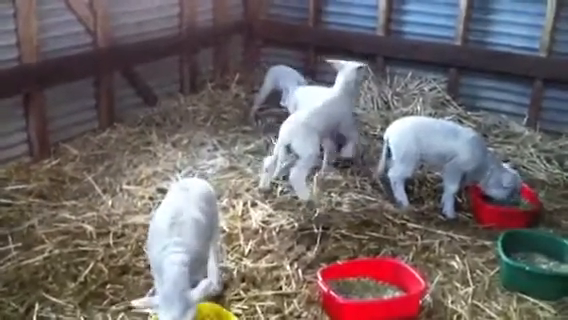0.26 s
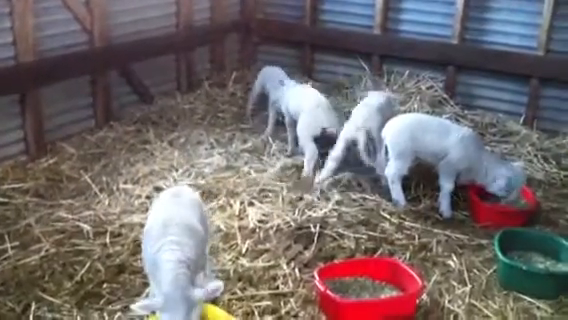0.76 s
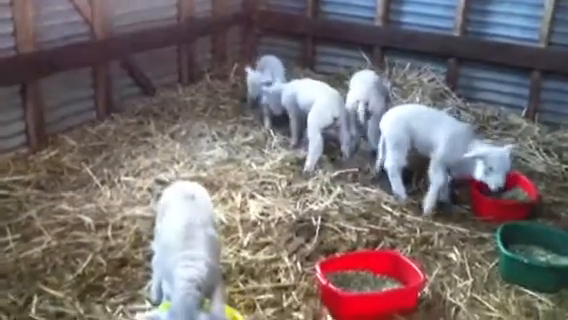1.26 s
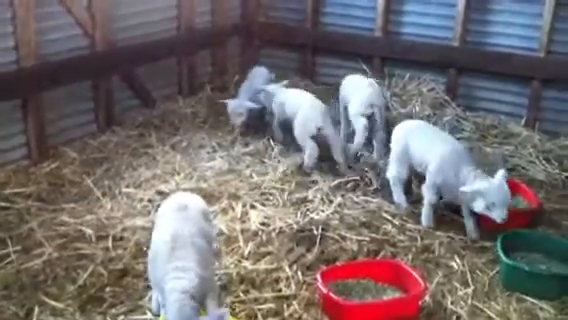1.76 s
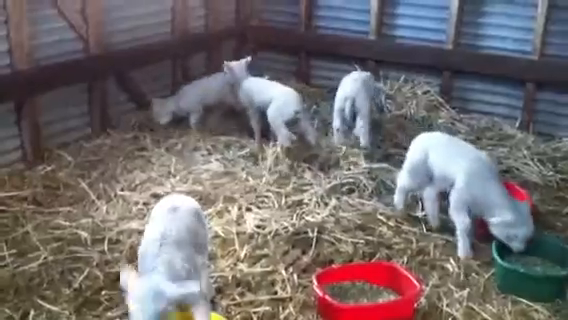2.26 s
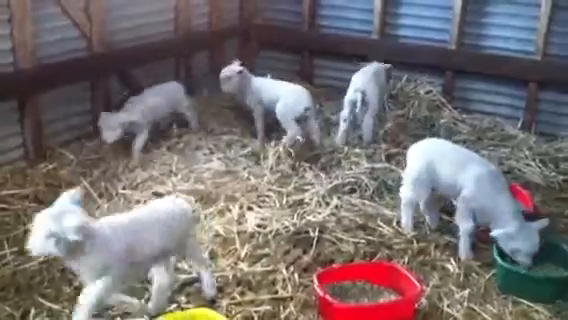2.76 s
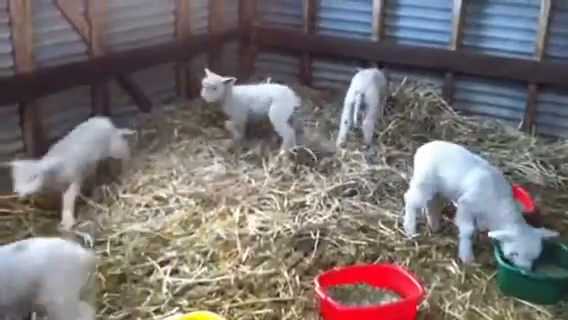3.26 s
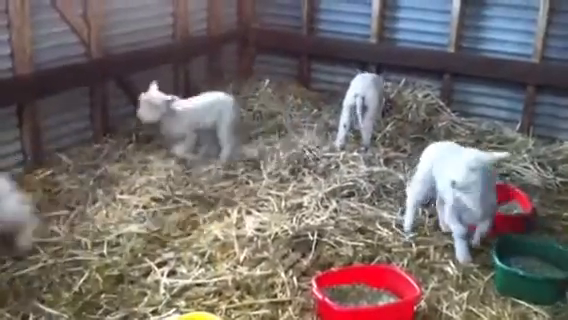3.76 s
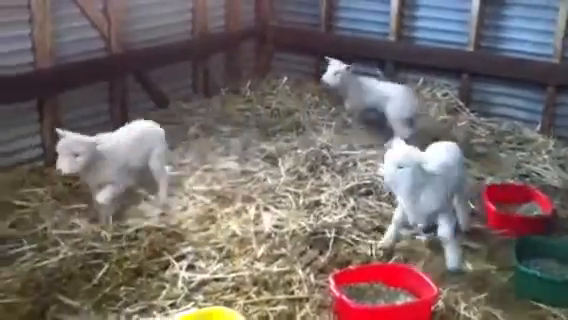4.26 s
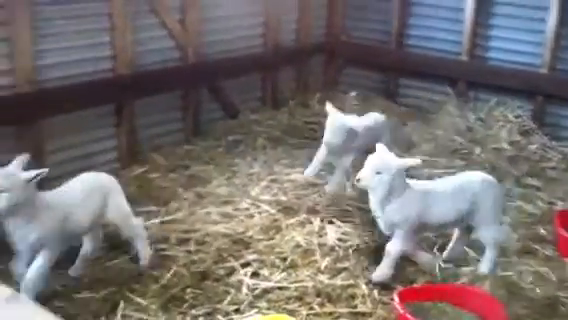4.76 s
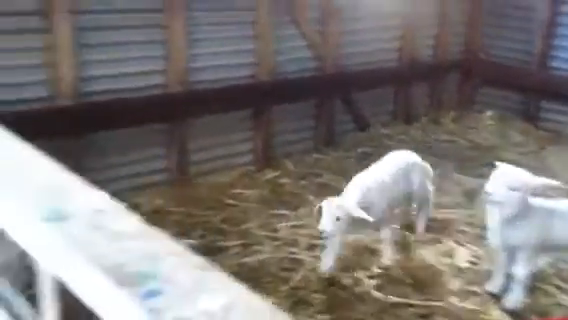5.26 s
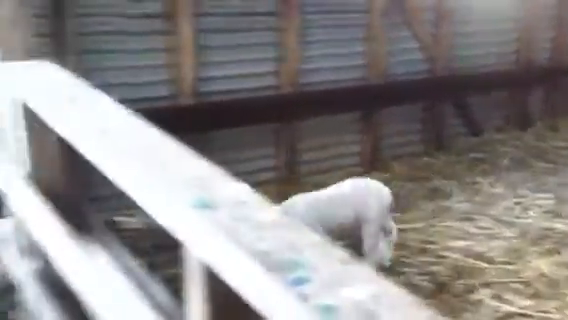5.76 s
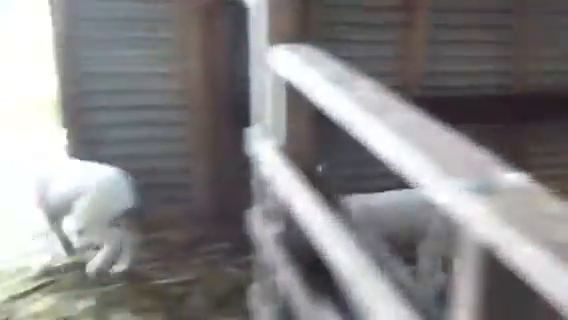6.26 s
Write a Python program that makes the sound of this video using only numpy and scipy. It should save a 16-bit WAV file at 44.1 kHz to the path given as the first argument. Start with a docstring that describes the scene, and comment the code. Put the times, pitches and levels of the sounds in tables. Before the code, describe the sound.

In a small tin shed, lambs move over dry straw near a single microphone, with a short echo and faint, low steady air noise. From 0 to 1 s the straw rustles lightly in separate steps, with small dull taps. At about 1.2 s a firmer low thud and scuff sound, then quieter shuffling. From 2 s the crackle grows brighter and denser, peaking near 2.3 s; hard woody knocks and a scrape come at 2.6-2.7 s with a burst of muffled patter. Between 3 and 4 s it is mostly quick straw steps, with a sharp stalk snap at 3.6 s. Trotting stays full from 4.1 to 5.2 s, knocks returning around 4.9 and 5.1 s. A distinct scuff comes near 5.4 s, a sharp snap at 5.5 s, then patter. The straw subsides; a very faint, wavering far bleat passes at 5.9-6.1 s, with last soft taps until 6.5 s.

```python
"""In a tin shed pen, lambs trot about on dry straw, close to a single microphone.
Straw crackles as clumped random snaps through band filters, with sharp ticks as single stalks break.
Hooves knock, scuff and patter on the boards below, heard as sums of decaying modes.
A thin far call, one wavering partial, sounds faintly near the end.
Sparse reflections give the shed's echo, over a steady low-weighted noise of air."""
import sys
import numpy as np
from scipy import signal
from scipy.io import wavfile
from scipy.ndimage import uniform_filter1d

SR = 44100
rng = np.random.default_rng(int(sys.argv[2]) if len(sys.argv) > 2 else 0)


def unload_audio(sound):
    """Save the sound as a 16-bit wav file, at the path given as the first command line argument."""
    columns = np.transpose(np.atleast_2d(sound))
    # keep every value between -1 and 1, then stretch to whole-number steps
    steps = np.round(np.clip(columns, -1, 1) * 32767)
    wavfile.write(sys.argv[1], SR, steps.astype(np.int16))


def volts_from_db(level):
    """Convert decibel levels to linear amplitude ratios."""
    exponent = np.asarray(level, float) / 20
    return 10 ** exponent


N = 287958  # length in samples
USUAL_DB = -50  # reference level of the straw


def evened(x):
    """Normalisation: scales a signal to rms 1."""
    return x / np.sqrt(np.mean(x ** 2) + 1e-20)


def read(points, hz):
    """Interpolation along straight lines on a log-frequency axis."""
    f, value = np.transpose(points)
    return np.interp(np.log(hz + 1), np.log(f + 1), value)


def curves(rows):
    """Linear interpolation in time: every column after the first, sample by sample."""
    s, *columns = np.transpose(rows)
    t = np.arange(N) / SR
    return [np.interp(t, s, column) for column in columns]


def coloured(x, points):
    """Minimum-phase filtering: the log gain fixes the phase through the Hilbert transform."""
    hz = abs(np.fft.fftfreq(8192, 1 / SR))
    log_gain = np.log(volts_from_db(np.maximum(read(points, hz), -100)))
    phase = -signal.hilbert(log_gain).imag
    taps = np.fft.ifft(np.exp(log_gain + 1j * phase)).real[:4096]
    return signal.oaconvolve(x, taps)[:len(x)]


def clicks(per_s, spread_db):
    """Random impulse train: chance instants and signs, most impulses small and a few large."""
    size = volts_from_db(spread_db * np.minimum(rng.exponential(1, N), 5))
    sign = np.sign(rng.standard_normal(N))
    return size * sign * (rng.random(N) < per_s / SR)


def wander(width):
    """Smoothed noise: two moving averages of width samples leave slow chance of rms 1."""
    once = uniform_filter1d(rng.standard_normal(N), width)
    return evened(uniform_filter1d(once, width))


# steady shuffle of the flock in the straw: start_s [s], level_db [dB]
SHUFFLE_LEVEL = [(0, -54.5), (.4, -55.5), (.55, -50.5), (1.3, -54), (1.65, -52), (2.0, -45), (2.5, -45),
                 (2.8, -47.5), (2.95, -44.5), (3.65, -48), (4.1, -43), (4.6, -45), (4.9, -52.5),
                 (5.3, -48.5), (5.75, -49.5), (5.85, -53), (6.4, -55.5), (6.53, -63)]
# a leg sweeping or a hoof landing in dry stalks:
# crest_s [s], level_db [dB], rise_s [s], fall_s [s]
STRIDES = [(.17, -52.5, 0.026, 0.045), (.235, -46, 0.047, 0.04), (.35, -51.5, 0.045, 0.034),
           (.465, -50.5, 0.033, 0.035), (.6, -45.5, 0.042, 0.098), (.72, -45, 0.022, 0.032),
           (.88, -44.5, 0.05, 0.12), (1.07, -44, 0.066, 0.14), (1.21, -55, 0.019, 0.026),
           (1.46, -48.5, 0.11, 0.063), (1.61, -49.5, 0.01, 0.024), (1.86, -50.5, 0.041, 0.036),
           (2.13, -42, 0.05, 0.042), (2.27, -39, 0.086, 0.086), (2.6, -42, 0.038, 0.034),
           (2.685, -41.5, 0.034, 0.054), (2.88, -47.5, .03, 0.052), (3.145, -45.5, 0.024, 0.044),
           (3.245, -46, 0.0091, .03), (3.36, -45, 0.059, 0.048), (3.46, -47.5, 0.048, 0.058),
           (3.615, -44, 0.041, 0.042), (3.73, -46, 0.012, 0.042), (3.85, -44, 0.041, 0.063),
           (4.04, -56, .015, 0.063), (4.15, -45.5, 0.048, 0.036), (4.285, -42.5, 0.032, 0.037),
           (4.4, -41, 0.067, 0.027), (4.48, -41.5, 0.032, 0.036), (4.6, -43, .05, 0.1),
           (4.785, -40.5, 0.03, 0.082), (4.98, -41.5, 0.036, 0.054), (5.16, -41, 0.055, 0.051),
           (5.38, -51, .06, 0.041), (5.54, -48, .008, .025), (5.71, -63, .04, .05),
           (5.89, -55, .012, 0.025), (6.08, -54, 0.073, 0.012), (6.17, -57, .03, .08),
           (6.5, -52.5, 0.041, .04)]
# bands where stalks snap, from thick to thin: low_hz [Hz], high_hz [Hz]
STALK_BANDS = [(250, 2000), (2000, 5000), (5000, 9000), (9000, 17000)]
# colour of snapping stalks, with the microphone's treble bump: pitch_hz [Hz], relative level_db [dB]
STRAW_COLOUR = [(300, -22), (500, -6.5), (1200, -6), (2400, -4.5), (5000, -0.5), (8400, 1), (10500, 4.5),
                (12000, 5.5), (13500, 4.5), (15000, -0.5), (16000, 1)]


def straw():
    """Granular noise: dense snaps clump as feet crush stalks, thick and thin partly on their own."""
    power = volts_from_db(curves(SHUFFLE_LEVEL)[0]) ** 2
    t = np.arange(N) / SR
    for crest, db, rise, fall in STRIDES:
        near = slice(max(round((crest - .5) * SR), 0), round((crest + .5) * SR))
        late = t[near] - crest
        width = np.where(late < 0, rise, fall)
        power[near] += volts_from_db(db) ** 2 * np.exp(-(late / width) ** 2)
    # thick stalks against thin: they swell slightly more
    thick_db = -9.5 + 0.0248 * (10 * np.log10(power) - USUAL_DB)

    shared_db = 0.51 * wander(400)
    bands = []
    for low, high in STALK_BANDS:
        snaps = clicks(per_s=9000, spread_db=1) * volts_from_db(shared_db + .5 * wander(300))
        band_pass = signal.butter(3, [low, high], "band", fs=SR, output="sos")
        bands.append(signal.sosfilt(band_pass, evened(snaps)))
    thick = evened(coloured(bands[0] + bands[1], STRAW_COLOUR))
    thin = evened(coloured(bands[2] + bands[3], STRAW_COLOUR))
    return np.sqrt(power) * (thin + volts_from_db(thick_db + 1.5 * wander(2500)) * thick)


# single dry stalks breaking: start_s [s], peak level_db [dB]
TICKS = [(3.5783, -26), (4.9627, -30), (5.2774, -33), (5.5368, -23), (6.129, -42)]


def ticks():
    """Impulse response: each break is one or two treble cycles; small ones follow the shuffle's level."""
    tick_hz, tick_s = 12600, .00009  # pitch; half-width of the Gaussian envelope
    small_db = -47.5 + curves(SHUFFLE_LEVEL)[0] - USUAL_DB  # of the least of the small ticks
    train = volts_from_db(small_db) * clicks(per_s=40, spread_db=3.5)
    for start, db in TICKS:
        train[round(start * SR)] += volts_from_db(db)
    t = np.arange(-40, 41) / SR
    tick = np.exp(-(t / tick_s) ** 2) * np.cos(2 * np.pi * tick_hz * t)
    return signal.oaconvolve(train, tick, "same")


# modes of the floor and boards: pitch_hz [Hz], level_db [dB], share of the blow's t60 [ratio]
BOARD_MODES = [(118, -9.5, 0.3), (156.4, 0.5, 0.67), (199.2, 0.5, 0.91), (253.5, 1.5, 0.68),
               (327.4, 6.5, 0.38), (367, 0.5, 0.52), (480.7, 0.5, 0.62), (560, 3, 0.79), (670, 10, 0.31),
               (715.6, 0.5, 0.84), (905, 8, 0.47), (1002, 3, 0.63), (1129, 3, 0.72), (1390, 8.5, 0.53),
               (1670, 5, 0.44), (1827, 4, 0.54), (2058, 7.5, 0.3), (2360, 14.5, 0.21), (2880, 7, 0.27),
               (3660, 5, 0.18)]


def ring(hz, fall_db, t60, chance):
    """Modal synthesis: a blow favours modes near its pitch, and loose boards make each flutter."""
    f, db, share = np.transpose(BOARD_MODES)[:, :, None]
    f = f * (1 + 0.1 * (chance[:, None] - .5))  # each blow lands on another spot
    t = np.arange(SR // 4) / SR
    # padded blows lose the upper modes faster
    near_db = -fall_db * abs(np.log2(f / hz)) * np.where(f > hz, 1.3, 1)
    decay_db = -60 * t / (max(t60, .03) * share)
    flutter_hz = (0.0516 + 0.1184 * np.roll(chance, 3)[:, None]) * f
    flutter_depth = 1.48 * np.roll(chance, 5)[:, None]
    flutter = 1 + flutter_depth * np.cos(2 * np.pi * flutter_hz * t)
    tones = np.sin(2 * np.pi * (f * t + 0.52 * chance[::-1, None]))
    swell = 1 - np.exp(-f * t)  # over about one cycle
    sound = (volts_from_db(db + near_db + decay_db) * flutter * tones * swell).sum(0)
    return sound / abs(sound).max()


def below_cut(x):
    """Inefficient radiation: thin boards hardly radiate their deepest bass."""
    return signal.sosfilt(signal.butter(6, 105, "high", fs=SR, output="sos"), x)


# single knocks: start_s [s], peak level_db before the bass cut [dB], favoured pitch_hz [Hz],
# fall below that pitch [dB per octave], t60_s before each mode's share [s]
KNOCKS = [(0.083, -52, 335, 6, 0.22), (0.146, -44, 177, 14, 0.063), (0.351, -47, 1180, 17, 0.13),
          (0.37, -40.5, 176, 13, 0.16), (0.448, -47, 670, 8, 0.17), (0.623, -46, 153, 17, 0.49),
          (0.653, -48, 540, 29, 0.18), (0.734, -46.5, 132, 19, 0.41), (0.795, -44.5, 213, 16, 0.34),
          (0.846, -40.5, 194, 20, 0.31), (1, -46.5, 171, 14, 0.082), (1.14, -51, 204, 16, 0.1),
          (1.19, -43.5, 159, 5.5, 0.3), (1.228, -32, 153, 7.5, 0.07), (1.229, -33.5, 495, 15, 0.17),
          (1.347, -39.5, 312, 7, 0.11), (1.391, -44, 303, 9, 0.09), (1.606, -43.5, 600, 6, 0.12),
          (1.609, -39.5, 178, 14, 0.12), (1.657, -42, 330, 8.5, 0.095), (1.775, -46, 204, 32, 0.084),
          (2.164, -43.5, 497, 32, 0.32), (2.309, -42, 400, 0, 0.19), (2.582, -27, 895, 6.5, 0.11),
          (2.645, -40, 860, 20, 0.28), (2.691, -26.5, 310, 9.5, 0.21), (2.717, -39, 175, 25, 0.25),
          (2.893, -38.5, 260, 7.5, 0.2), (2.93, -38.5, 160, 15, 0.27), (2.962, -45.5, 1250, 15, 0.1),
          (2.984, -41.5, 200, 3, 0.17), (3.022, -46, 185, 14, 0.31), (3.656, -44, 177, 5, 0.078),
          (3.798, -54, 181, 26, 0.11), (4.388, -47, 191, 2, 0.12), (4.485, -43.5, 526, 12, 0.38),
          (4.779, -45, 361, 11, 0.13), (4.931, -36, 382, 7.5, 0.22), (4.951, -33, 220, 26, 0.16),
          (5.136, -31, 159, 9.5, 0.15), (5.383, -32.5, 560, 4, 0.16), (5.418, -38, 168, 6, 0.22),
          (5.458, -37, 265, 14, 0.16), (5.519, -41.5, 337, 14, 0.11), (5.609, -41, 214, 10, 0.3),
          (5.74, -45, 175, 5, 0.28), (5.987, -46, 165, 11.5, 0.34), (6.128, -44.5, 196, 8, 0.22),
          (6.198, -44.5, 154, 4.5, 0.11), (6.382, -53, 243, 11, 0.39)]


def knocks():
    """Impact excitation: each hoof on something hard sets the modes ringing once."""
    out = np.zeros(N + SR)
    chances = rng.random((len(KNOCKS), len(BOARD_MODES)))
    for (start, db, hz, fall_db, t60), chance in zip(KNOCKS, chances):
        out[round(start * SR):][:SR // 4] += volts_from_db(db) * ring(hz, fall_db, t60, chance)
    return below_cut(out[:N])


# hooves dragged or tubs shoved over the boards: start_s [s], end_s [s],
# rms level_db before the bass cut [dB], favoured pitch_hz [Hz], fall below that pitch [dB per octave]
SCUFFS = [(0.784, 0.928, -64, 447, 14), (1.235, 1.304, -55, 510, 31), (1.33, 1.424, -57.5, 423, 23),
          (1.923, 2.02, -65, 460, 21), (2.316, 2.419, -60, 655, 4.5), (2.588, 2.685, -52, 800, 7),
          (2.81, 2.88, -60, 400, 15), (2.913, 2.993, -61, 503, 6), (4.33, 4.56, -63.5, 550, 6),
          (4.752, 4.84, -62, 490, 9), (5.318, 5.4, -61.5, 605, 19), (5.375, 5.5, -47.5, 523, 14),
          (5.57, 5.684, -57.5, 610, 3), (6.164, 6.26, -65, 775, 12)]


def scuffs():
    """Stick-slip friction: tiny slips each ring the boards, under a stroke that starts fast and fades."""
    out = np.zeros(N + SR)
    slips = clicks(per_s=500, spread_db=3.2)
    chances = rng.random((len(SCUFFS), len(BOARD_MODES)))
    for (start, end, db, hz, fall_db), chance in zip(SCUFFS, chances):
        part = slips[round(start * SR):round(end * SR)]
        u = np.linspace(0, 1, len(part))
        stroke = np.minimum(u / 0.2, 1) * volts_from_db(-11 * u)
        brief_ring = ring(hz, fall_db, 0.039, chance)[:SR // 10]
        sound = signal.oaconvolve(part * stroke, brief_ring)
        out[round(start * SR):][:len(sound)] += volts_from_db(db) * evened(sound)
    return below_cut(out[:N])


# muffled drumming of many small feet through the bedding: start_s [s], level_db [dB]
PATTER_LEVEL = [(0, -63.5), (.3, -66), (.62, -57.5), (.9, -60.5), (1.0, -66), (1.25, -55.5), (1.45, -67.5),
                (2.03, -69), (2.27, -55.5), (2.44, -69), (2.72, -46.5), (2.85, -70), (3.1, -61.5),
                (4.1, -65.5), (4.4, -56), (5.1, -57), (5.35, -58.5), (5.56, -51.5), (5.85, -59),
                (6.53, -62)]


def patter():
    """Superposed random impacts: footfalls too many to count, dull thumps of eight chance pitches."""
    pats_per_s = 160  # of all eight kinds together
    thumps = np.zeros(N)
    for kind in rng.random((8, 1 + len(BOARD_MODES))):
        thump = ring(150 * 2.2 ** kind[0], 9.8, 0.16, kind[1:])
        thumps += signal.oaconvolve(clicks(pats_per_s / 8, 1.9), thump)[:N]
    return volts_from_db(curves(PATTER_LEVEL)[0]) * evened(below_cut(thumps))


# far call, only its brightest partial carries:
# start_s [s], pitch_hz before the waver [Hz], level_db before the throb [dB]
CALL = [(5.86, 2040, -73), (5.9, 2020, -63), (5.96, 1975, -68), (6.0, 2090, -72), (6.07, 2130, -71),
        (6.12, 2130, -82)]


def call():
    """Frequency and amplitude modulation: a faint, hoarse partial wavers and throbs like a bleat."""
    hz, db = curves(CALL)
    t = np.arange(N) / SR
    throb = 1 + 0.28 * np.sin(2 * np.pi * 14 * t) + .4 * wander(300)
    wavering_hz = hz * (1 + 0.022 * wander(90))
    tone = np.sin(2 * np.pi * np.cumsum(wavering_hz) / SR)
    sounding = (t > CALL[0][0]) * (t < CALL[-1][0])
    return np.sqrt(2) * volts_from_db(db) * throb * tone * sounding


# decay of the shed's echo: pitch_hz [Hz], t60_s [s]
SHED_DECAY = [(150, 0.43), (600, 0.29), (2000, 0.2), (8000, 0.12)]


def shed(x):
    """Reverberation: sparse reflections of random sign, each band dying at its own speed."""
    taps = np.zeros(SR)
    at = np.arange(300, SR - 20, 20)  # samples: one reflection in every slot of 20
    taps[at + rng.integers(0, 20, len(at))] = rng.choice([-1., 1.], len(at))
    hz, t, z = signal.stft(taps, SR, nperseg=512)
    decay = volts_from_db(-60 * t / read(SHED_DECAY, hz)[:, None])
    tail = signal.istft(z * decay, SR, nperseg=512)[1]
    return signal.oaconvolve(x, tail / np.linalg.norm(tail))[:N]


# colour of the steady air noise: pitch_hz [Hz], relative level_db [dB]
AIR_COLOUR = [(20, -8), (28, -10), (45, -18), (68, -10), (95, -0.5), (130, -5.5), (200, -5), (400, -9),
              (700, -5.5), (1300, -7), (3000, -8.5), (6000, -17.5)]


def air():
    """Filtered noise: steady Gaussian noise takes a fixed spectrum."""
    return volts_from_db(-61.5) * evened(coloured(rng.standard_normal(N), AIR_COLOUR))


def scene():
    """Superposition: all sources add at one microphone, fed to both channels."""
    rustle = straw() + ticks() + patter()
    hard = knocks() + scuffs() + call()
    echo = shed(volts_from_db(-12) * hard + volts_from_db(-21.5) * rustle)
    mono = rustle + hard + echo + air()
    return np.array([mono, mono])


def top_cut(x):
    """Nothing passes above the cut-off."""
    return signal.sosfilt(signal.butter(12, 16580, fs=SR, output="sos"), x)


def record(dry):
    """Band limiting: a linear-phase low-pass at 15950 Hz finishes the mix."""
    low_pass = signal.firwin(1023, 15950, window=("kaiser", 9), fs=SR)
    mix = signal.oaconvolve(dry, low_pass[None], "same")
    return top_cut(mix)


dry = scene()
out = record(dry)
unload_audio(out)
```